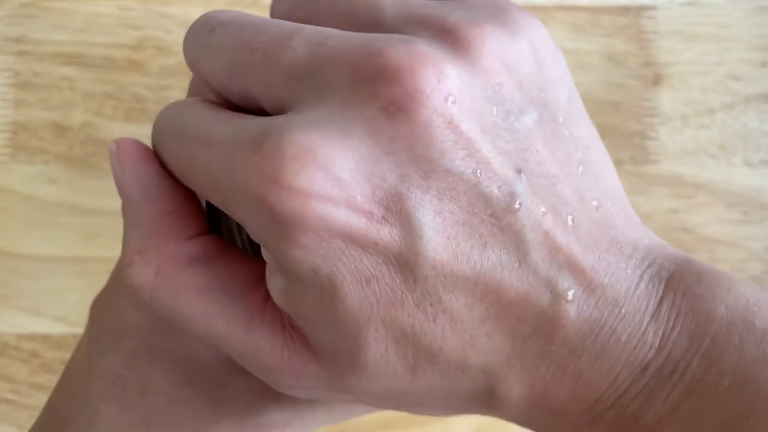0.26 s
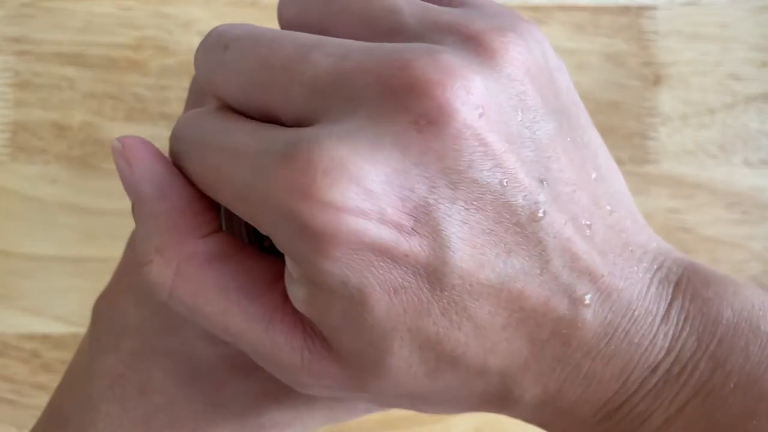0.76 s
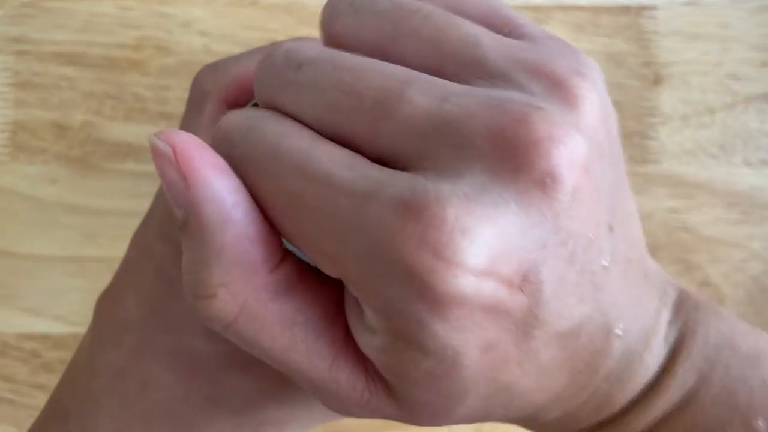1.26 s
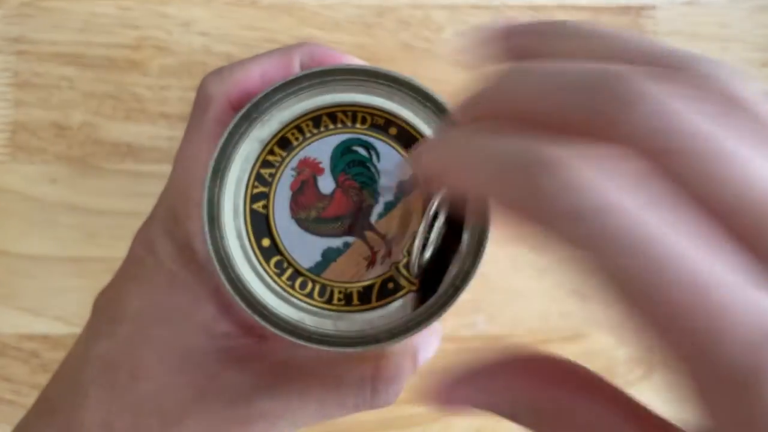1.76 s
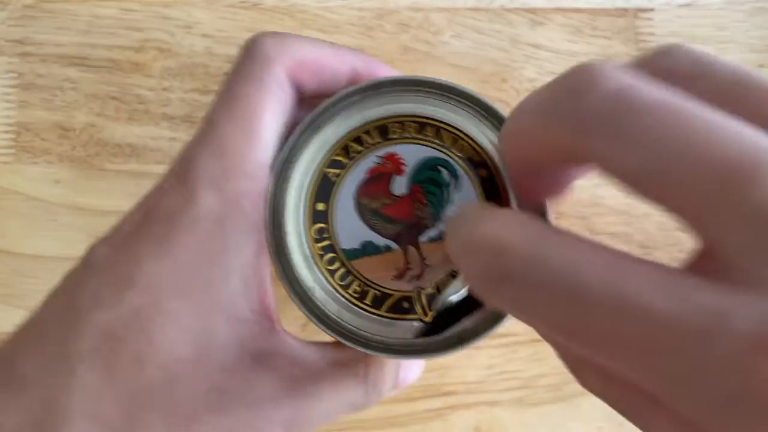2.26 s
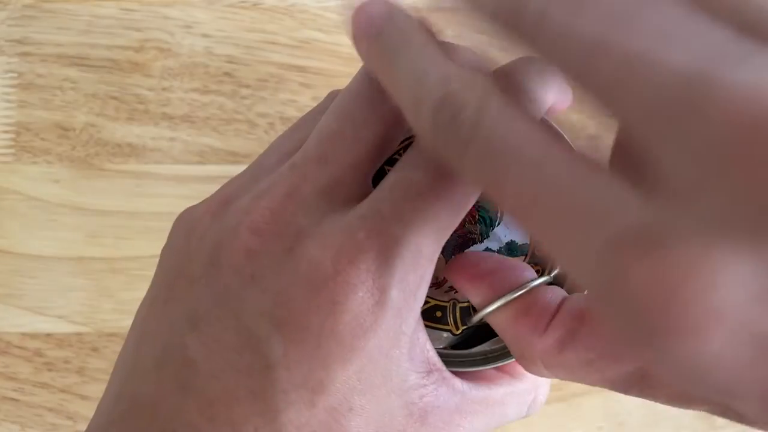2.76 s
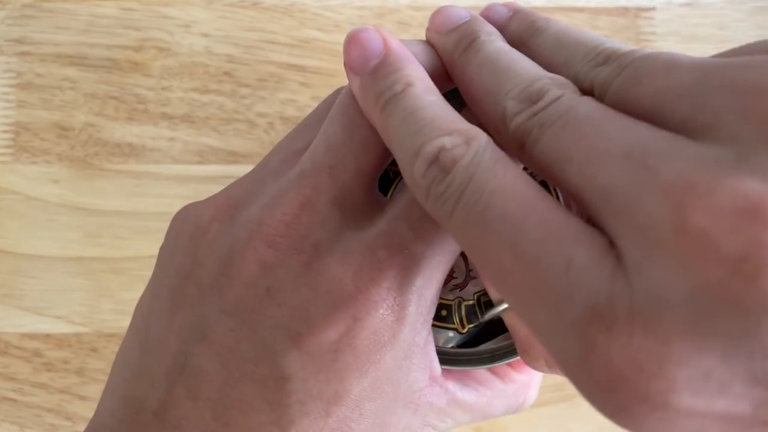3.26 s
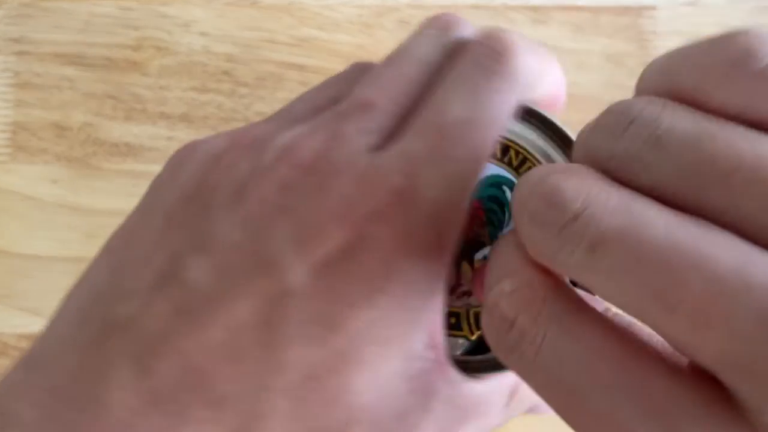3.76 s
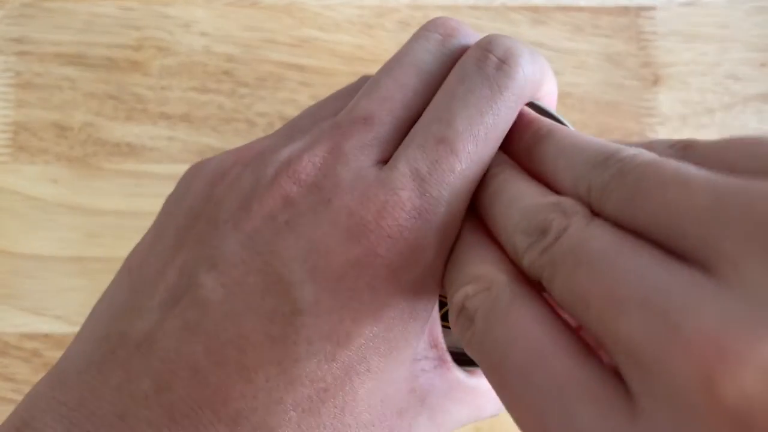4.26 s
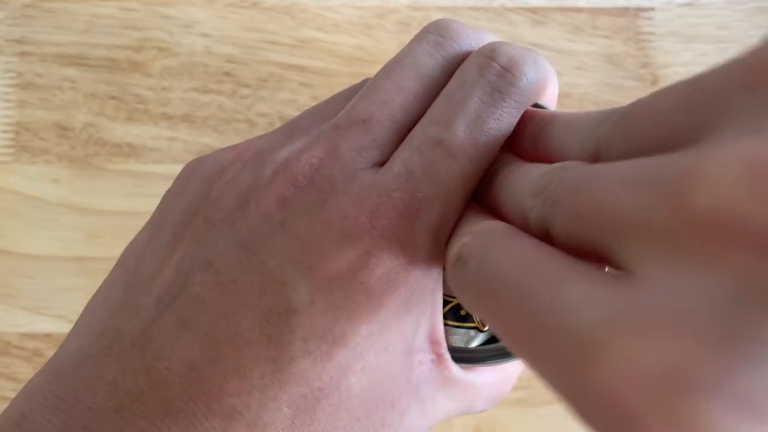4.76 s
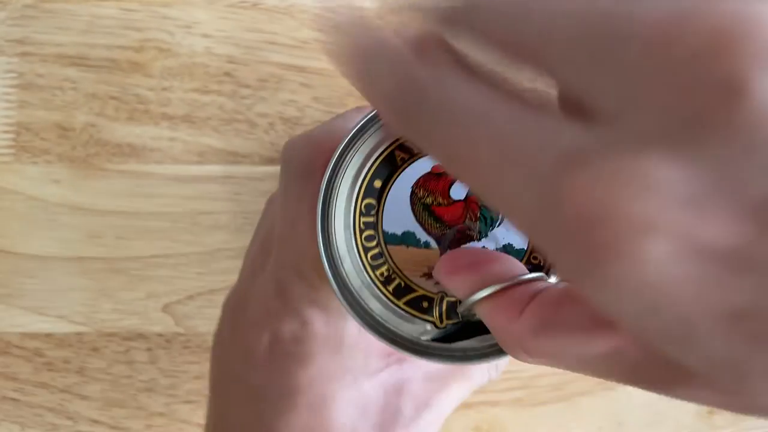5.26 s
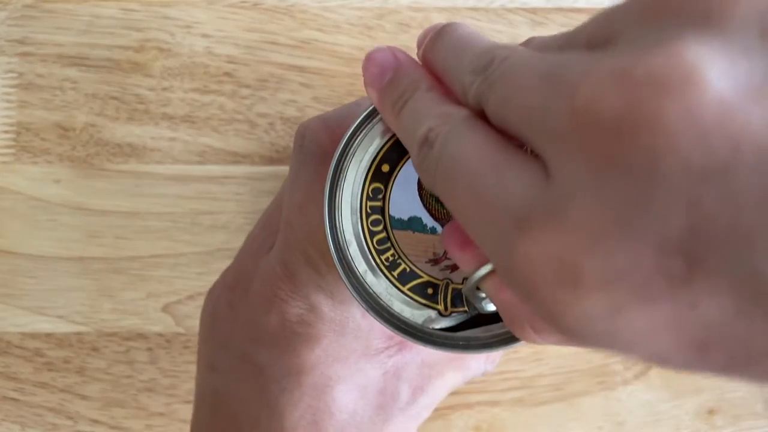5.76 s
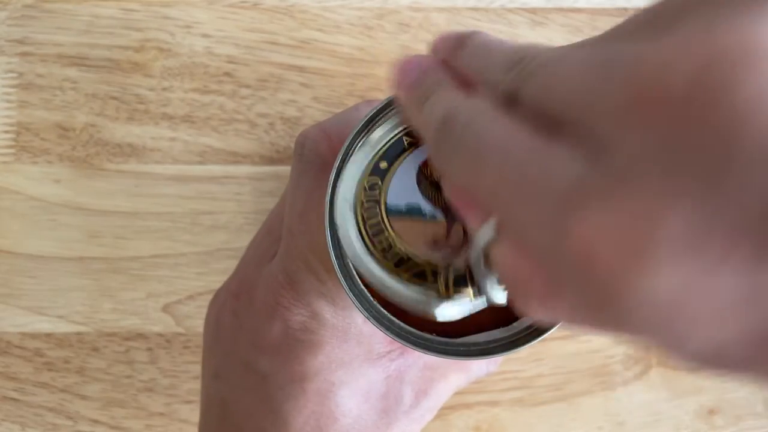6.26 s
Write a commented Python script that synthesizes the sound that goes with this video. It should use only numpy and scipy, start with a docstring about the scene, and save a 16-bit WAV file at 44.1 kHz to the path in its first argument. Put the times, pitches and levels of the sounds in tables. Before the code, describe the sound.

Close metallic snaps from a can's lid, a firm knock on wood, soft finger rubbing, sharp clicks, and finally a short creaking tear.

```python
"""Traffic drones outside a small room; then, close by, a ring pull snaps back on the lid of a tin can.
The can is slid round on a wooden table and set down, the lid pops, and its scored seam creaks and tears.
Snaps, knocks and tears are dying sines and short noise bursts; sliding and rubbing are noise and clicks
through resonances, shaped by hand movements. The traffic is a wavering sum of sines over coloured noise."""
import sys
import numpy as np
from scipy import signal
from scipy.fft import rfft, irfft
from scipy.io import wavfile

SR = 44100
rng = np.random.default_rng(int(sys.argv[2]) if len(sys.argv) > 2 else 0)


def wrap_up_sound(samples):
    """Save the sound to the file named by the first command line argument, as 16-bit audio."""
    columns = np.atleast_2d(samples).T
    # keep every value between -1 and 1, then stretch to whole-number steps
    tamed = np.clip(columns, -1, 1)
    steps = np.round(tamed * 32767).astype(np.int16)
    wavfile.write(sys.argv[1], SR, steps)


N = 286419
TIME = np.arange(N) / SR
HIT = TIME[:SR // 3]  # the clock of one blow, in seconds

# Traffic: the engine's orders [multiple of its turning rate, level/dB]
ENGINE_ORDERS = [(1, -4), (1.5, -8.5), (2.5, -3.5), (3, -5.5), (4.5, -11), (6, -14.5)]
# the room booms at one low resonance [t/s, level/dB]
BOOM_LEVELS = [(0, -63.5), (1.4, -51), (3.3, -58), (4.2, -45.5), (5.8, -55)]
# traffic wash and room air [f/Hz, level per Hz/dB]
AIR_COLOUR = [(22, -35), (64, -5), (111, -13.5), (145, -8.5), (405, -26), (800, -27.5), (1100, -35.5),
              (3720, -46.5), (16000, -59)]
# an engine outside speeds up slowly as it draws away
ENGINE_HZ, ENGINE_RISE_HZ_PER_S = 62.6, 2.3
ENGINE_NEAR_DB, ENGINE_FAR_DB, ENGINE_FADE_S = -43, -55, 1.96
BOOM_HZ, BOOM_SPREAD_HZ = 143.4, 4.2
AIR_DB = -47.5
DIP_S, DIP_LENGTH_S, DIP_DB = 1.0, 0.26, -9  # the drone dips briefly

# The ring or the lid snaps [t/s, level/dB, lid tension (factor on its low modes), lower favoured mode f/Hz,
# its level/dB, upper favoured mode f/Hz, its level/dB, treble edge f/Hz, rebound level/dB]
SNAP_EVENTS = [(.4190, -14.5, 1.0, 1440, -4.5, 4120, -8.5, 12300, -9),
               (.6539, -20, 1.3, 1574, -0.5, 4167, -7, 13890, -17.5),
               (.9795, -16, .93, 2628, -11, 3910, -5, 9000, -10),
               (1.0017, -21.5, .78, 2070, 3, 6230, -8, 14980, -10),
               (3.8646, -28.5, 1.06, 2955, -1.5, 4087, -6.5, 10000, -19),
               (4.5666, -25.5, 1.2, 2264, 4, 2922, -2.5, 14090, -6),
               (4.5726, -21, 1.3, 2410, -8, 7880, -6.5, 15040, -12),
               (4.582, -16.5, 1.18, 2314, -2.5, 3243, 3.5, 15000, -10.5),
               (4.7722, -22.5, 1.5, 1236, 6.5, 2323, -14, 1707, -28.5),
               (5.0773, -24, 1.21, 3400, -5, 7000, -9, 14100, -11),
               (5.0873, -35, 1.2, 4375, 0, 5270, -2.5, 14060, -7),
               (6.2779, -18.5, 1.72, 2320, 4.5, 6360, -16.5, 2200, -15)]
# fingernails and the loose ring tap the lid [t/s, level/dB, favoured mode f/Hz, treble edge f/Hz]
TAP_EVENTS = [(.620, -46, 4200, 6070), (.648, -39, 1404, 1767), (1.329, -43, 1535, 5970),
              (1.354, -39, 1606, 12000), (1.731, -41.5, 2082, 3500), (3.506, -43.5, 6270, 16100),
              (4.028, -42.5, 1544, 11900), (4.859, -47, 2750, 12200), (5.111, -44, 5046, 12000),
              (5.207, -49, 3796, 14000), (5.723, -43.5, 3370, 10970)]
# modes of the lid [f/Hz, level/dB, time to fall 60 dB t/s]
LID_MODES = [(950.4, 5.5, 0.043), (1390, 4.5, 0.013), (2330, 2, 0.014), (2980, -5, 0.015),
             (3306, 0.5, 0.028), (3858, -1, 0.031), (4160, -8.5, 0.038), (4900, -2, 0.012),
             (7700, -13.5, 0.016)]
# the tin's dense upper modes [f/Hz, level per Hz/dB]
CLASH_COLOUR = [(100, -14), (550, -10), (1200, 2), (1900, -2), (4700, -1), (6500, -7.5), (10000, -9.5),
                (16000, -14)]
REBOUND_S, REBOUND_TENSION = .0032, 1.2  # every snap strikes again, weaker, on a slightly tauter lid
TAP_TENSION, TAP_MODE_DB = 1.22, -1.5
FAVOURED_CYCLES = 55  # a favoured mode falls 60 dB within this many cycles
AFTER_DB, AFTER_T60_S = -25, .3  # the lid's modes ring on faintly after a snap
TICK_DB, TICK_S = -12, 0.00038  # the first contact of metal on metal

# Bands of the long ringing [f/Hz, width of each of two filter passes f/Hz, level/dB]
TWANG_BANDS = [(796, 70, -2), (1657, 380, 2), (1898, 260, -2), (3930, 3200, -10), (6220, 660, -13)]

# The can meets the table, or is pressed onto it
# [t/s, can level/dB, treble edge f/Hz, table level before doubling/dB]
KNOCK_EVENTS = [(1.003, -38.5, 594, -43), (2.2382, -15, 1730, -27), (3.412, -29, 1760, -30.5),
                (3.633, -65, 602, -41.5), (3.764, -36, 1780, -37), (4.588, -38, 1500, -37.5),
                (4.960, -25, 1390, -33.5), (5.2684, -25, 1520, -29.5), (6.277, -24, 1190, -42)]
# modes of the full can [f/Hz, level/dB, time to fall 60 dB t/s]
CAN_MODES = [(280, -14, 0.26), (393.8, -15, 0.21), (536, -0.5, 0.047), (637, -0.5, 0.085), (822, -5, 0.09),
             (1119, 5, 0.052), (1190, 11.5, 0.023), (1559, 10, 0.036)]
# modes of the table [f/Hz, level/dB, time to fall 60 dB t/s]
TABLE_MODES = [(73.7, -4, 0.16), (96.7, -2, 0.24), (145, -2.5, 0.26)]

# The fingers shift their grip
# [start t/s, length t/s, skin hiss level/dB, tin ringing level/dB]
RUB_MOVES = [(1.265, .17, -54, -55), (1.625, 0.069, -59.5, -45.5), (1.42, 1.27, -51, -58),
             (2.164, 0.41, -50, -63), (2.44, 0.076, -47.5, -54), (2.42, .52, -58.5, -75),
             (3.417, 0.51, -53.5, -65), (3.536, 0.95, -65.5, -58), (5.08, 0.28, -57, -53.5)]
# dry skin scuffs over the rim [start t/s, length t/s, level/dB]
SCUFF_MOVES = [(1.32, .08, -62), (1.65, .035, -62), (2.27, 0.17, -56), (3.73, 0.12, -56.5)]
# pushes of the can across the table [start t/s, length t/s, level/dB]
SLIDE_MOVES = [(1.945, 0.26, -32), (2.09, 0.2, -43), (2.26, 0.2, -33.5), (5.135, 0.14, -44.5)]
# skin rubs on tin and skin [f/Hz, level per Hz/dB]
SKIN_COLOUR = [(300, 11), (1100, 2), (3700, 0.5), (8000, -12.5), (11000, -13.5), (16000, -17)]
# resonances of the wall that colour the rubbing [f/Hz, level/dB]
SKIN_BANDS = [(3350, -1), (3850, 2.5), (5400, -3.5), (6990, -14)]
# modes of the can's wall under rubbing fingers [f/Hz, level/dB, time to fall 60 dB t/s]
WALL_MODES = [(1063, 4.5, 0.055), (1520, 6.5, 0.025), (2570, 11, 0.009), (3700, 1, 0.022)]
# the can's base slides over wood [f/Hz, level per Hz/dB]
WOOD_COLOUR = [(250, -12), (520, 0), (850, -26), (3300, -18.5), (8000, -36.5)]
# resonances of the sliding base [f/Hz, width f/Hz, level/dB]
BASE_BANDS = [(565, 170, -8), (1152, 110, 1.5), (1597, 170, -2)]
SCUFFS_PER_S, CATCHES_PER_S = 600, 350

# The seam creaks at each pull, mostly harder as it nears breaking [start t/s, length t/s, level/dB]
CREAK_PULLS = [(5.942, 0.028, -54), (5.988, 0.059, -45.5), (6.042, 0.031, -42), (6.122, 0.063, -32.5),
               (6.176, 0.064, -34), (6.206, 0.035, -23)]
# the taut lid's modes under the creaking seam [f/Hz, level/dB, time to fall 60 dB t/s]
SEAM_MODES = [(1314, 5, 0.027), (2310, -5.5, 0.022), (3520, -12.5, .026), (5350, -18.5, 0.022)]
# the freed lid springs up and the open can resounds [f/Hz, level/dB, time to fall 60 dB t/s]
SPRING_MODES = [(271.5, -0.5, 0.064), (1323, 10.5, 0.032)]
SPRING_S, SPRING_DB = 6.279, -21.5
SLIPS_PER_S, FRACTURES_PER_S = 240, 2400  # the slip rate wanders around its figure
CRACKLE_DB = -15.5  # small fractures within a creak, relative to it
# the score rips: a quick rise, a steady fade as the strain is spent, a sudden stop
RIP_S, RIP_LENGTH_S, RIP_RISE_S, RIP_STOP_S = 6.198, 0.080, 0.035, 0.0029
RIP_DB, RIP_FADE_DB_PER_S = -16, 170
# the freed flap's note climbs as it bends
FLAP_HZ, FLAP_RISE_HZ_PER_S, FLAP_WIDTH_HZ, FLAP_DB = 1140, 12500, 690, -7.5

EDGE_HZ = 16250  # nothing much is heard above this


def amp(db):
    """Turns decibels into gain."""
    return 10 ** (np.asarray(db) / 20)


def evened(x):
    """Scales a lasting sound to an rms (average strength) of 1."""
    return x / np.sqrt(np.mean(x ** 2) + 1e-20)


def blow(x):
    """Scales a hit to the energy of 10 ms at rms 1."""
    return x / np.sqrt(np.sum(x ** 2) / (SR / 100) + 1e-20)


def held(rows):
    """Joins the levels (last column, dB) into a gain curve, held beyond its ends."""
    rows = np.array(rows)
    return amp(np.interp(TIME, rows[:, 0], rows[:, -1]))


def add(mix, s, sound):
    """Mixes a sound in at time s, cut off where the mix ends."""
    part = mix[round(s * SR):][:len(sound)]
    part += sound[:len(part)]


def noise(colour, size):
    """Makes noise of rms 1 with the given spectrum."""
    hz, db = np.transpose(colour)
    bins_hz = np.fft.rfftfreq(size, 1 / SR)
    gain = amp(np.interp(np.log(bins_hz + 1), np.log(hz), db))
    return evened(irfft(rfft(rng.standard_normal(size)) * gain, size))


def wander(hz):
    """Makes a smooth random curve of rms 1; a higher hz makes it quicker."""
    slowness = np.exp(-(np.fft.rfftfreq(N, 1 / SR) / hz) ** 2)
    return evened(irfft(rfft(rng.standard_normal(N)) * slowness, N))


def grains(per_s):
    """Scatters clicks of random size at random moments."""
    return (rng.random(N) < per_s / SR) * rng.standard_normal(N)


def dull(x, edge_hz):
    """Takes off treble, as a softer contact does."""
    return signal.sosfilt(signal.butter(2, min(edge_hz, SR / 2.1), fs=SR, output="sos"), x)


def without_bass(x, edge_hz):
    """Takes off everything well below the edge."""
    return signal.sosfilt(signal.butter(2, edge_hz, "high", fs=SR, output="sos"), x)


def resonate(x, hz, q):
    """Passes sound through one resonance of gain 1; a higher q is narrower."""
    return signal.lfilter(*signal.iirpeak(hz, q, fs=SR), x)


def glide(x, hz, width_hz):
    """Passes sound through a steep resonance whose centre follows the curve hz; rms 1."""
    turn = np.exp(2j * np.pi * np.cumsum(hz) / SR)
    r = np.exp(-np.pi * width_hz / SR)
    # shift the centre down to 0 Hz, smooth there, and shift back
    smooth = signal.lfilter([1], [1, -2 * r, r * r], x / turn + 1e-18)
    return evened((turn * smooth).real)


def ring(modes, tension=1):
    """Sums dying sines of alternating sign; tension bends the lowest modes most."""
    lowest = modes[0][0]
    total = 0
    for k, (hz, db, t60) in enumerate(modes):
        bent_hz = hz * tension ** ((lowest / hz) ** 2)
        total = total + (-1) ** k * amp(db - 60 * HIT / t60) * np.sin(2 * np.pi * bent_hz * HIT)
    return total


def tail(x, db, t60, edge_hz):
    """Adds a diffuse tail that swells in a few milliseconds and dies away."""
    t = TIME[:SR]
    taps = signal.lfilter(*signal.butter(1, min(edge_hz, SR / 2.1), fs=SR), rng.standard_normal(SR))
    fade = np.exp(-np.log(1000) * t / t60)  # down 60 dB after t60
    wet = signal.fftconvolve(x, taps * fade * (1 - np.exp(-t / 0.0023)))
    return np.pad(x, (0, SR - 1)) + amp(db) * wet * np.linalg.norm(x) / np.linalg.norm(wet)


def arch(start, length, skew, power):
    """Swells from 0 to 1 and back; a skew under 1 peaks early, a high power narrows it."""
    return np.abs(np.sin(np.pi * np.clip((TIME - start) / length, 0, 1) ** skew)) ** power


def strokes(rows, skew, power, column=2):
    """Gives the gain of a series of hand movements, each one arch."""
    return sum(amp(row[column]) * arch(row[0], row[1], skew, power) for row in rows)


def traffic():
    """An uneven engine's harmonics and a low wash come through the walls, and the room booms."""
    pitch_hz = (ENGINE_HZ + ENGINE_RISE_HZ_PER_S * TIME) * (1 + 0.00807 * wander(6))
    turns = np.cumsum(pitch_hz) / SR
    engine = 0
    for multiple, db in ENGINE_ORDERS:
        uneven = amp(db + 3.8 * wander(6.2))
        engine = engine + uneven * np.sin(2 * np.pi * (multiple * turns + rng.random()))
    nearness = np.exp(-(TIME / ENGINE_FADE_S) ** 2)
    engine_db = ENGINE_FAR_DB + (ENGINE_NEAR_DB - ENGINE_FAR_DB) * nearness
    drone = amp(engine_db) * evened(engine) + amp(AIR_DB) * noise(AIR_COLOUR, N)
    dip = amp(DIP_DB * arch(DIP_S, DIP_LENGTH_S, skew=.6, power=1))
    # two slow random curves on a sine and a cosine make a narrow band of noise
    angle = 2 * np.pi * BOOM_HZ * TIME
    boom = wander(BOOM_SPREAD_HZ) * np.cos(angle) + wander(BOOM_SPREAD_HZ) * np.sin(angle)
    return held(BOOM_LEVELS) * evened(boom) + dip * drone


def lid(tension, clash_db, clash_s):
    """One blow on the lid sets off its clear modes and a short clash of dense ones."""
    fade = np.exp(-HIT / clash_s) + amp(-13.0) * np.exp(-HIT / 0.011)
    clash = noise(CLASH_COLOUR, len(HIT)) * fade
    return blow(ring(LID_MODES, tension)) + amp(clash_db) * blow(clash)


def strike(db, tension, favoured, edge_hz):
    """The place struck decides which modes [f/Hz, level/dB] stand out of the clatter; a faint ringing follows."""
    tick = np.diff(rng.standard_normal(len(HIT)), prepend=0) * np.exp(-HIT / TICK_S)
    after = ring([(hz, 0, AFTER_T60_S) for hz, _, _ in LID_MODES], tension)
    clatter = lid(tension, clash_db=0.5, clash_s=0.0024)
    clatter = clatter + amp(TICK_DB) * blow(tick) + amp(AFTER_DB) * blow(after)
    hit = blow(dull(clatter, edge_hz))
    for hz, mode_db in favoured:
        hit = hit + amp(mode_db) * blow(ring([(hz, 0, FAVOURED_CYCLES / hz)]))
    onset = 1 - np.exp(-HIT / 0.00022)
    return amp(db) * blow(hit * onset)


def snaps():
    """Hard snaps with their rebounds, and light taps, all strike the one lid."""
    out = np.zeros(N)
    for s, db, tension, low_hz, low_db, high_hz, high_db, edge_hz, rebound_db in SNAP_EVENTS:
        favoured = [(low_hz, low_db), (high_hz, high_db)]
        add(out, s, strike(db, tension, favoured, edge_hz))
        add(out, s + REBOUND_S, strike(db + rebound_db, tension * REBOUND_TENSION, [], edge_hz))
    for s, db, hz, edge_hz in TAP_EVENTS:
        add(out, s, strike(db, TAP_TENSION, [(hz, TAP_MODE_DB)], edge_hz))
    return tail(out, db=-17.5, t60=0.43, edge_hz=10000)[:N]


def twang(s, db, after_db, t60, damp_s, damp_db_per_s):
    """A hard snap rings a few bands: a loud short twang, then a fuzzy after-ring until the fingers damp it."""
    hiss = rng.standard_normal(N)
    bands = amp(-16.0) * noise(CLASH_COLOUR, N)  # the dense modes ring on faintly between the bands
    for hz, width, band_db in TWANG_BANDS:
        once = resonate(hiss, hz, hz / width)
        bands = bands + amp(band_db) * evened(resonate(once, hz, hz / width))
    age = np.maximum(TIME - s, 0)
    out = amp(after_db) * evened(bands) * np.exp(-np.log(1000) * age / t60) * (TIME > s)
    out = out * amp(-damp_db_per_s * np.maximum(TIME - damp_s, 0))
    loud = ring([(hz, band_db, .02) for hz, _, band_db in TWANG_BANDS])
    add(out, s, amp(db) * blow(loud * (1 - np.exp(-HIT / 0.0015))))
    return out


def knocks():
    """The rim lands, rocks onto its other side a moment later, and the table thuds."""
    out = np.zeros(N)
    grit_colour = [(100, -11.5), (500, 1.5), (2000, -1.5), (12000, -17.5)]  # [f/Hz, level per Hz/dB]
    for s, db, edge_hz, table_db in KNOCK_EVENTS:
        can = np.zeros(len(HIT))
        for delay, share in [(0, .8), (.003, .55)]:
            grit = noise(grit_colour, len(HIT)) * np.exp(-HIT / 0.0057)
            add(can, delay, share * amp(0.5) * blow(grit))
        body = blow(ring(CAN_MODES) * (1 - np.exp(-HIT / 0.00043)))
        can = dull(can + body, edge_hz)
        add(out, s, tail(amp(db) * blow(can), db=-8.5, t60=0.4, edge_hz=5200))
        thud = blow(ring(TABLE_MODES) * (1 - np.exp(-HIT / 0.0019)))
        add(out, s + 0.005, amp(table_db) * 2 * thud)
    return out


def rubbing():
    """Fingers shift their grip: skin hisses on the tin, catches and rings it, and scuffs the rim."""
    dense_modes = rng.standard_normal(len(HIT)) * np.exp(-HIT / .004)  # the thin wall stamps fixed bands on the hiss
    hiss = noise(SKIN_COLOUR, N) * amp(2.7 * wander(120) + 2.0 * wander(11))
    bands = sum(amp(db) * evened(resonate(hiss, hz, q=50)) for hz, db in SKIN_BANDS)
    through_wall = evened(signal.fftconvolve(hiss, dense_modes)[:N])
    skin = evened(through_wall + amp(-10.5) * evened(bands))

    catches = grains(CATCHES_PER_S) * amp(2.3 * wander(40))
    tin_modes = blow(ring(WALL_MODES)) + .5 * blow(ring(LID_MODES))
    tin = evened(signal.fftconvolve(catches, tin_modes)[:N])
    scuff = evened(signal.fftconvolve(grains(SCUFFS_PER_S), dense_modes)[:N])

    return (strokes(RUB_MOVES, skew=1.0, power=0.96) * skin
            + strokes(RUB_MOVES, skew=1.1, power=2.4, column=3) * tin
            + strokes(SCUFF_MOVES, skew=0.86, power=1) * scuff)


def sliding():
    """The can judders over the wood grain, which shakes the resonances of its base."""
    grain = rng.standard_normal(N) * amp(2.6 * wander(180))
    shift = 1 + 0.02 * wander(9.6)  # the base's resonances shift as the contact moves
    base = evened(sum(amp(db) * glide(grain, hz * shift, width) for hz, width, db in BASE_BANDS))
    scrape = base + amp(-11.5) * noise(WOOD_COLOUR, N)
    judder = amp(0.86 * wander(70))
    return strokes(SLIDE_MOVES, skew=0.77, power=3.6) * evened(scrape * judder)


def creaking():
    """The seam sticks and slips, and each slip rings the taut lid; rms 1."""
    slip_count = np.floor(np.cumsum(SLIPS_PER_S * np.exp(.6 * wander(200))) / SR)
    slips = np.diff(slip_count, prepend=0) * amp(2.8 * wander(204))
    return evened(without_bass(signal.fftconvolve(slips, ring(SEAM_MODES))[:N], 1000))


def ripping(age):
    """Dense fractures ring the whole lid, and the freed flap's note climbs with age in seconds; rms 1."""
    rip = 0
    for tension in (1.4, 1.7, 2.1):  # the bending lid is tauter in some places than in others
        one_blow = lid(tension, clash_db=-0.5, clash_s=0.0011)
        rip = rip + signal.fftconvolve(grains(FRACTURES_PER_S), one_blow)[:N]
    rip = (rip + 2.1 * resonate(rip, 3350, q=1.7)) * amp(1.4 * wander(300))
    rip = without_bass(rip, 1900)  # so small a plate radiates little bass
    flap = glide(grains(FRACTURES_PER_S), FLAP_HZ + FLAP_RISE_HZ_PER_S * age, FLAP_WIDTH_HZ)
    return evened(dull(evened(rip) + amp(FLAP_DB) * flap, 13400))


def tear():
    """The pulled seam creaks and crackles, the score rips, and the lid springs free."""
    age = np.clip(TIME - RIP_S, 0, RIP_LENGTH_S)
    rise_and_stop = np.minimum(age / RIP_RISE_S, 1) ** 3 * np.minimum((RIP_LENGTH_S - age) / RIP_STOP_S, 1)
    strain = amp(RIP_DB - RIP_FADE_DB_PER_S * np.maximum(age - RIP_RISE_S, 0))
    pull = strokes(CREAK_PULLS, skew=0.89, power=1.57)
    rip_gain = rise_and_stop * strain + amp(CRACKLE_DB) * pull
    seam = pull * creaking() + rip_gain * ripping(age)
    spring = blow(ring(SPRING_MODES) * (1 - np.exp(-HIT / 0.0013)))
    add(seam, SPRING_S, amp(SPRING_DB) * spring)
    return tail(seam, db=-18.5, t60=0.34, edge_hz=6400)[:N]


def scene():
    """Adds up every source at one microphone."""
    mix = traffic() + snaps()
    mix = mix + twang(s=1.0012, db=-15.5, after_db=-43.5, t60=3.2, damp_s=1.385, damp_db_per_s=53)
    mix = mix + knocks() + rubbing() + sliding() + tear()
    return mix[None]


def record(dry):
    """Rounds off the sharpest peaks as a soft overload, then cuts the top of the treble."""
    ceiling = .7
    rounded = dry / (1 + (dry / ceiling) ** 4) ** .25
    band_limit = signal.firwin(511, EDGE_HZ, window=("kaiser", 9), fs=SR)
    return signal.oaconvolve(rounded, band_limit[None], "same")


dry = scene()
out = record(dry)
wrap_up_sound(out)
```